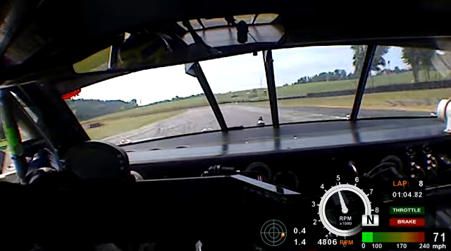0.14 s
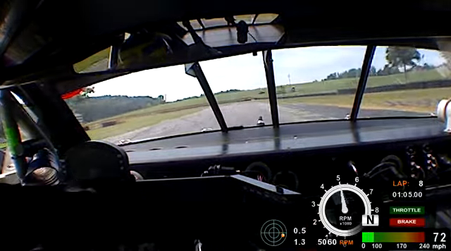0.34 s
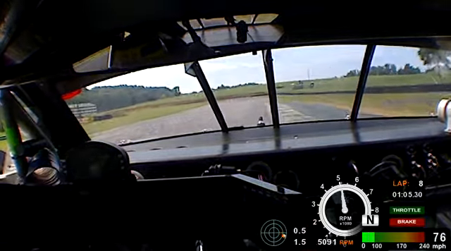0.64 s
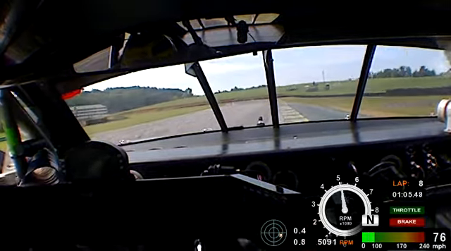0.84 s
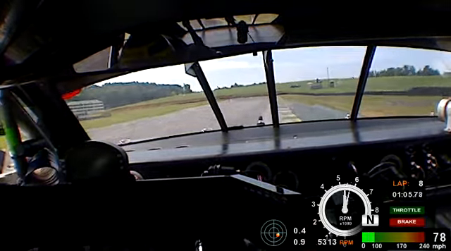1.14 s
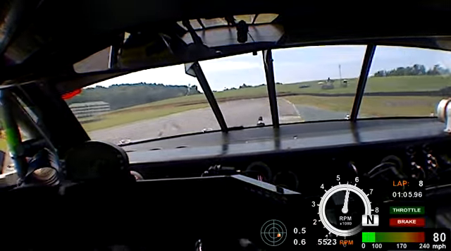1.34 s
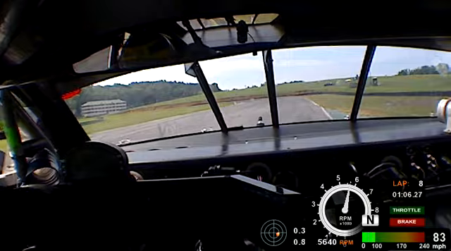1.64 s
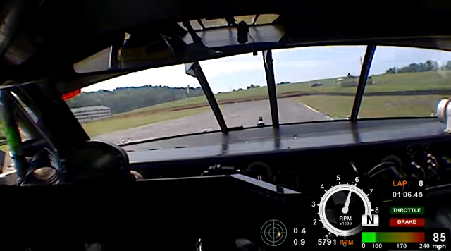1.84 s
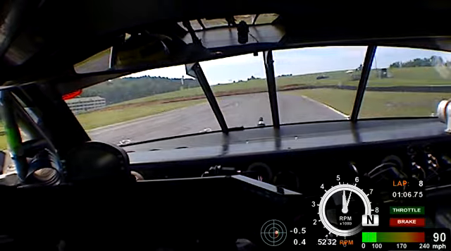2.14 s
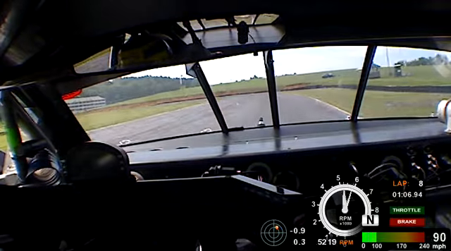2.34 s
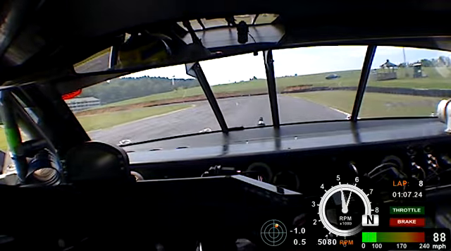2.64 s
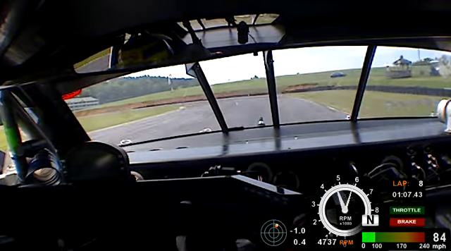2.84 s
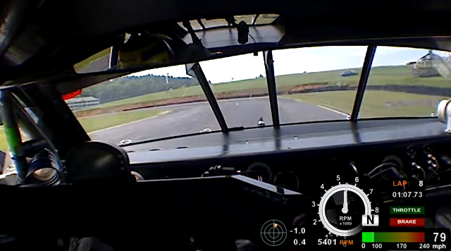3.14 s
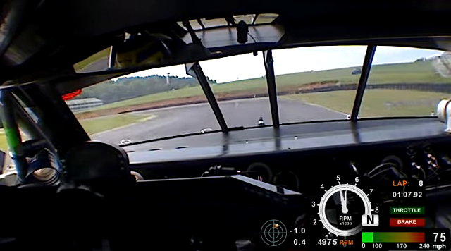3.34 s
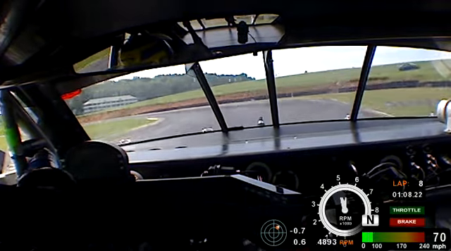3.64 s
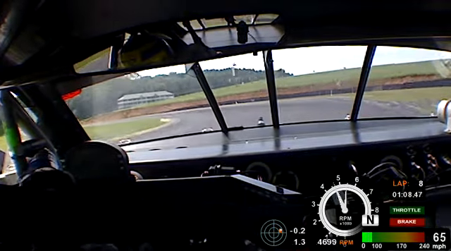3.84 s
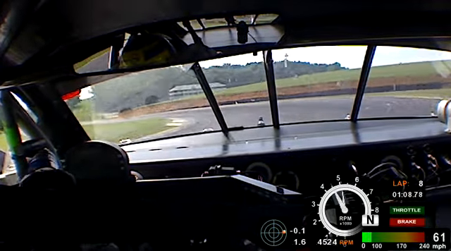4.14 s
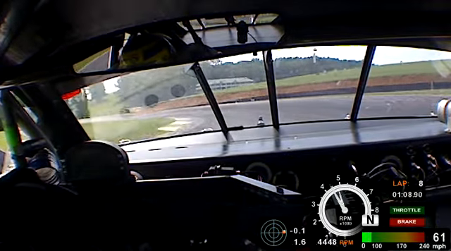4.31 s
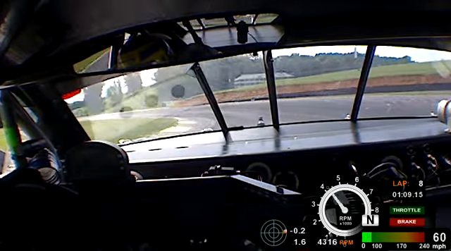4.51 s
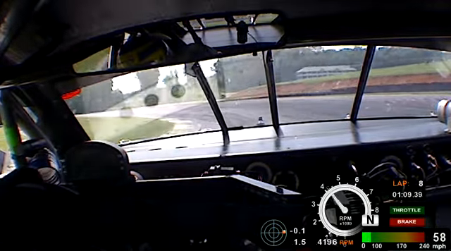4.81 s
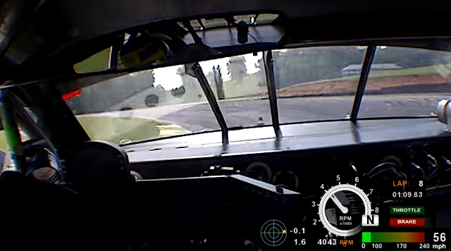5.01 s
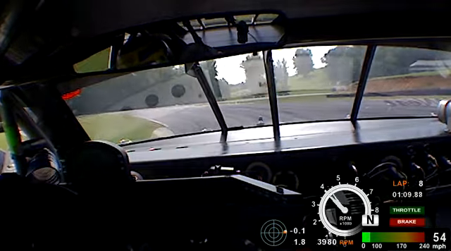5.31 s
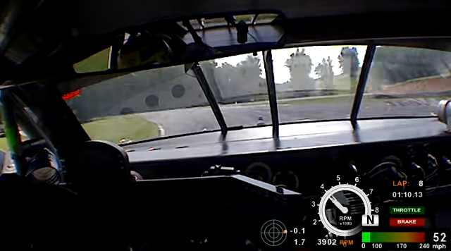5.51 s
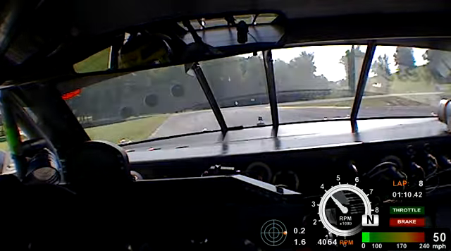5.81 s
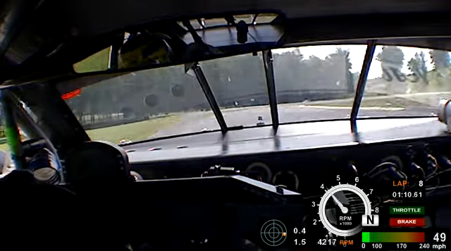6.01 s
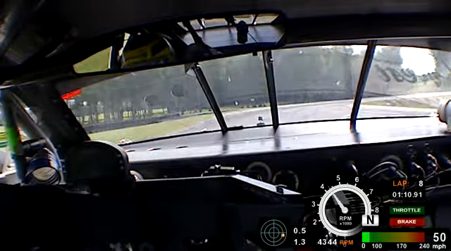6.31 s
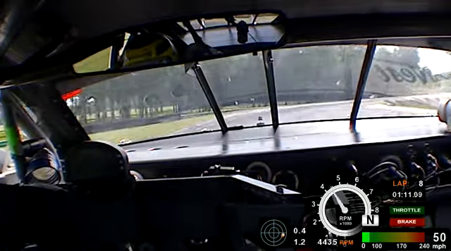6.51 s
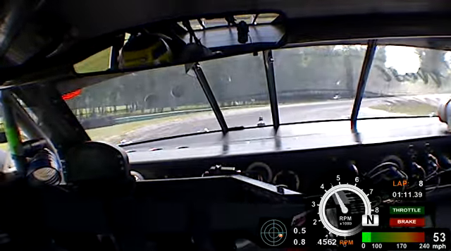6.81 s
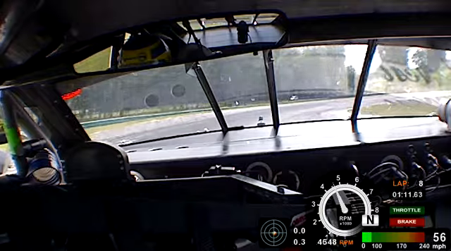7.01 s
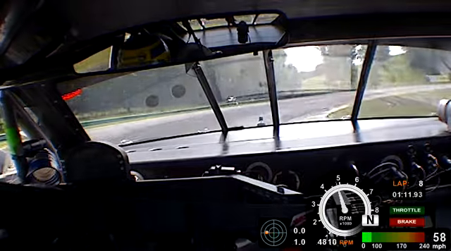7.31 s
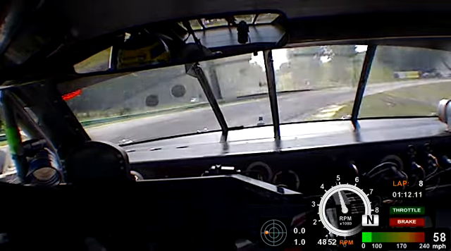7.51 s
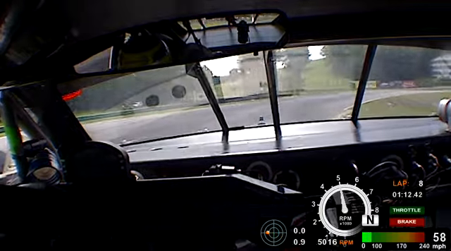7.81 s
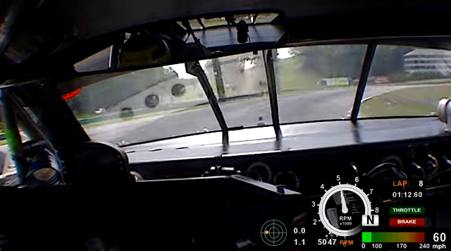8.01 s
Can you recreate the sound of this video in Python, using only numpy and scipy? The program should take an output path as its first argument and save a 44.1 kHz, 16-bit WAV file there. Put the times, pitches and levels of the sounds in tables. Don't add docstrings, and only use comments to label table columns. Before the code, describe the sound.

A rough, mono in-car sound: a gruff V8 under power, heavy kerb knocks, and panel roar. Throttle shuts, the roar drops, a downshift flares the revs briefly, and a clear gear whine slides down. After a small clunk, power returns with rising engine and strong whine, light tyre slip and final bumps, close and distorted with dull treble.

```python
import sys
import numpy as np
from scipy import signal
from scipy.fft import rfft, irfft, next_fast_len
from scipy.io import wavfile

SR = 44100
rng = np.random.default_rng(int(sys.argv[2]) if len(sys.argv) > 2 else 0)


def unload_audio(sound):
    columns = np.transpose(np.atleast_2d(sound))
    steps = np.round(np.clip(columns, -1, 1) * 32767)
    wavfile.write(sys.argv[1], SR, steps.astype(np.int16))


def gain_from_decibels(decibels):
    exponent = np.asarray(decibels, float) / 20
    return 10 ** exponent


N = 359415

# time_s, cycle_hz, order1_db, order3_db, order5_db, order6_db, order8_db
ENGINE_NOTES = [(0.0, 40.4, -25, -38, -28, -25, -31), (0.11, 41.15, -29, -31.0, -26.0, -40, -35.0),
                (0.3, 42.2, -25.5, -28.5, -22.5, -46, -32), (0.5, 42.8, -27.0, -27.5, -25.0, -32, -40),
                (0.7, 43.5, -23, -19, -27, -38, -36.0), (0.88, 44.35, -31, -19.5, -23.0, -33, -36),
                (1.11, 44.82, -33, -25, -28, -27, -34.0), (1.43, 46.65, -27.0, -17, -27.0, -39, -40.0),
                (1.6, 47.43, -28.0, -17.5, -39, -39, -36), (1.77, 48.8, -25, -13.5, -32.0, -34, -31.0),
                (1.86, 48.86, -20, -19.5, -26, -46, -34), (1.93, 45.8, -29, -15, -29.5, -39, -51),
                (2.18, 44.45, -29.0, -18.5, -21.5, -31, -43), (2.38, 42.2, -39.0, -19.5, -43, -34.0, -46),
                (2.54, 40.5, -25, -19.0, -41.0, -25.5, -39), (2.7, 39.1, -30, -20.5, -48, -28, -32),
                (2.77, 41.03, -20, -32, -30, -35, -36), (2.84, 45.06, -21, -21.5, -28.5, -35, -41),
                (2.95, 45.36, -34, -13, -24, -39.0, -38), (3.2, 42.12, -30, -20.5, -35, -31, -42),
                (3.45, 40.37, -38, -21.5, -32.5, -25, -33.5), (3.7, 39.54, -33, -27, -31.0, -26.0, -29),
                (4.0, 38.18, -35, -23.5, -23.5, -28.5, -33.5), (4.27, 36.79, -32.0, -34, -23.5, -30, -51),
                (4.86, 34.16, -33, -34, -28.5, -39, -43.5), (5.11, 33.27, -36, -30, -36.5, -43, -54),
                (5.45, 32.44, -40, -52, -27.5, -33.5, -39.5), (5.7, 33.97, -37, -54, -29, -35.5, -37),
                (5.9, 35.1, -44, -40, -22.0, -27.5, -28.5), (6.15, 36.25, -34, -34.5, -16.5, -28.5, -41),
                (6.51, 38, -38, -44, -20.5, -27.0, -48), (6.67, 37.7, -33.0, -47, -22.5, -29.0, -50),
                (6.94, 38.82, -33, -29, -29, -36, -37), (7.26, 40.5, -29.5, -26, -28.5, -29, -37),
                (7.72, 40.91, -28.5, -26.5, -28.5, -28, -41), (8.04, 42.78, -18.5, -20, -20.5, -28.5, -36),
                (8.15, 43.16, -27, -27.0, -43, -30.0, -34)]
# order, on_power_db, off_throttle_db
UNEVEN_FIRING = [(2, -30, -38.5), (4, -28.5, -32), (7, -37, -46), (12, -43.5, -43.5), (13, -37.5, -50.5),
                 (14, -42.5, -53), (15, -41, -51.5), (16, -42, -51), (17, -51, -58.5), (18, -41, -56.5),
                 (19, -44, -57), (20, -40, -53)]
# time_s, order9_db, order10_db, order11_db
INTAKE_BARK = [(0.0, -41, -25.5, -27.8), (0.29, -48, -50, -19), (0.58, -26, -28, -23.5),
               (0.87, -28.1, -25, -27.5), (1.16, -30.5, -28, -32.5), (1.46, -25.5, -20, -43),
               (1.749, -20, -24.5, -41), (2.04, -41, -43, -49), (2.33, -46, -40.5, -32.5),
               (2.91, -48, -36, -31.5), (3.2, -46, -36, -30.5), (3.49, -44, -28.5, -36),
               (3.78, -53, -45, -37), (4.37, -44, -39.5, -53), (5.241, -56, -45.2, -53.5),
               (5.53, -38, -63, -35), (5.82, -32.5, -47.4, -42.5), (6.4, -51, -42.4, -30),
               (6.69, -54, -46, -32), (6.99, -47, -42.5, -32), (7.57, -34.5, -36, -31),
               (7.86, -35.5, -34.5, -28.5), (8.15, -34, -34, -28.5)]
# pitch_hz, width_hz, lift_db
CABIN_BOOM = [(168, 35, -7.5), (471, 20, 7), (806, 87, 5.5)]
# time_s, pitch_hz, level_db
AXLE_WHINE = [(1.95, 1810, -41), (2.05, 1838, -31), (2.25, 1798, -24.5), (2.35, 1752, -28.5),
              (2.45, 1723, -21), (2.55, 1691.0, -28.5), (2.65, 1630, -23.0), (2.75, 1614, -21.5),
              (2.85, 1527, -35.8), (3.05, 1497, -35.5), (3.15, 1435, -34), (3.25, 1392, -41),
              (3.35, 1363, -22.5), (3.45, 1380, -34), (3.55, 1341.0, -31.5), (3.75, 1314, -35),
              (3.95, 1277, -25.5), (4.05, 1273, -22), (4.15, 1249.0, -23), (4.25, 1234, -18),
              (4.35, 1230, -24), (4.45, 1212, -29.5), (4.55, 1189, -25.5), (4.65, 1178, -29),
              (4.75, 1154, -37), (4.95, 1134, -34.5), (5.25, 1077, -30.5), (5.35, 1061, -33),
              (5.45, 1079, -32), (5.55, 1097, -33.5), (5.65, 1140, -33.5), (5.75, 1140, -23),
              (5.95, 1176.0, -19), (6.15, 1211, -18.5), (6.25, 1238, -14), (6.35, 1253, -12.5),
              (6.65, 1274, -12.5), (6.75, 1265, -22), (6.85, 1308, -24.5), (6.95, 1330, -32),
              (7.05, 1333, -28), (7.15, 1344.0, -22.5), (7.65, 1367, -22.5), (7.75, 1369, -27),
              (7.85, 1408, -25), (7.95, 1419, -27.5), (8.15, 1449.0, -27.5)]
# time_s, pitch_hz, level_db
GEARBOX_WHINES = [
    [(0.0, 1650, -23.5), (0.2, 1732, -30), (0.4, 1844, -32), (0.6, 1742, -33), (0.8, 1866, -45)],
    [(0.7, 1662, -35.1), (0.9, 1594, -27), (1.1, 1601, -47), (1.3, 1611, -23.5), (1.5, 1651, -43),
     (1.7, 1735, -36.2), (1.9, 1732, -53)],
    [(1.3, 1240, -48), (1.6, 1270, -29), (1.9, 1302, -42.1)],
    [(1.1, 1610, -27), (1.3, 1726, -32), (1.5, 1723, -43), (1.7, 1837, -42), (1.9, 1720, -39)],
    [(2.95, 1777.0, -33), (3.25, 1630.0, -38), (3.85, 1515.0, -44), (4.45, 1404.0, -32),
     (4.75, 1351.0, -37), (5.35, 1262.0, -41), (5.65, 1315.0, -33.5), (5.95, 1375.0, -25),
     (6.25, 1434.0, -26.5), (6.55, 1475.0, -32.8), (6.85, 1515.0, -36), (7.45, 1588.0, -30.5),
     (8.05, 1677.0, -35)],
    [(5.45, 1400, -32.5), (5.58, 1380, -48)],
    [(5.47, 1200, -33), (5.58, 1009, -45.5)],
]
# centre_s, half_length_s
TEETH_PART = [(2.768, 0.038), (3.432, 0.011), (3.598, 0.0094), (4.051, 0.02), (5.428, 0.048),
              (4.195, 0.0064), (4.366, 0.009), (6.169, 0.014), (6.801, .012), (6.88, 0.0072), (6.95, 0.011),
              (7.018, 0.014), (7.089, 0.017), (7.854, 0.017)]
# time_s, pitch_hz, level_db
TYRE_SCRUB = [
    (7.15, 929, -61),
    (7.35, 1032, -32.5),
    (7.68, 1047, -31),
    (7.8, 887, -33.5),
    (8.15, 853.4, -40),
]
# pitch_hz, width_hz, lift_db
PANEL_MODES = [(1704, 10, 8), (2260, 85, 3.5), (2570, 14, 8.5), (3073, 17, 11), (3870, 210, 5),
               (5130, 73, -6.5), (5540, 37, 4), (5940, 35, 6.5)]
# time_s, floor_rumble_db, panel_roar_db, hiss_db
ROAR_LEVELS = [(0, -19, -30.0, -41.5), (0.1, -17.5, -27, -38.5), (0.5, -17, -26, -36.5),
               (0.6, -5.5, -24.5, -36), (0.75, -7.5, -24, -34.5), (0.97, -3, -23.5, -35.0),
               (1.1, -10, -25.5, -35), (1.4, -13, -26.5, -34.5), (1.7, -13.5, -25.0, -34),
               (1.86, -9.5, -26.5, -35), (1.89, -12, -32.0, -46), (1.92, -11, -33.5, -44),
               (1.95, -7, -28.5, -37), (2.05, -15.5, -29.0, -43.5), (2.25, -16, -31, -42),
               (2.33, -12.5, -32.5, -47.0), (2.55, -19.5, -32.5, -47), (2.73, -11.5, -33.5, -47.5),
               (2.77, -18.0, -34.5, -51), (2.83, -17, -31, -43), (2.95, -23, -30.0, -40.5),
               (3.1, -31, -33, -45.0), (3.25, -18.5, -33, -46.5), (3.8, -22, -33, -48.5),
               (4.2, -15, -33, -49.5), (4.45, -28, -34.5, -50.5), (4.75, -18, -35.5, -54.5),
               (5.05, -25.0, -37.5, -59.0), (5.3, -20, -36, -58), (5.4, -26.0, -39, -64.0),
               (5.46, -19, -36.5, -54.5), (5.68, -23.5, -35, -55.5), (5.8, -12, -31, -47.5),
               (6, -22, -29, -43), (6.15, -19, -29, -43.5), (6.35, -24, -28.5, -38.5),
               (6.55, -18.5, -28.0, -40), (6.68, -28, -29, -43.5), (6.75, -21.5, -33.5, -53.0),
               (6.9, -31, -33.5, -53), (7.3, -27, -33, -48), (7.72, -24, -32.5, -49),
               (7.8, -8, -29.5, -46.0), (7.88, -16, -31.5, -44.5), (8, -12.5, -26.5, -42),
               (8.15, -10.5, -29.0, -43)]
# frequency_hz, level_db (per Hz)
RUMBLE_COLOUR = [(12, -44), (20, -6), (44, -2), (75, -7), (143, 2.5), (206, 1), (264, -19), (376, -28),
                 (400, -11.5), (520, -47), (880, -120)]
# frequency_hz, level_db (per Hz)
PANELS_ON_POWER = [(150, -40), (250, -2), (364, -15), (447, -1.5), (561, -14), (865, -11), (1070, -14.5),
                   (1550, -10), (1710, -9), (2830, -14), (3060, -15.5), (3430, -24.5), (3800, -26.5),
                   (4940, -54.5), (8360, -120)]
# frequency_hz, level_db (per Hz)
PANELS_OFF_THROTTLE = [(150, -29.5), (250, -1), (377, -15.5), (484, 2), (681, -21), (865, 1.5),
                       (1000, -8.5), (1260, -3), (1510, -7.5), (1750, -4.5), (2610, -12), (3170, -15),
                       (3800, -27), (4940, -49.5), (8360, -120)]
# frequency_hz, level_db (per Hz)
HISS_COLOUR = [(1880, -25.5), (3200, -2.5), (3480, -18.5), (4720, -9), (5230, -16), (5830, -13.5),
               (6380, -18), (7130, -16), (7750, -11.5), (8590, -24.5), (11200, -85.5), (18900, -120)]
# start_s, peak_db, pitch_hz
FLOOR_THUMPS = [(0.563, 7, 143), (0.583, 3, 145), (0.614, 6.5, 229), (0.64, 5.5, 165), (0.734, -2, 138),
                (0.797, -3, 136), (0.82, -2, 133.7), (0.939, 1.5, 146.8), (0.974, 5, 209),
                (1.931, -10, 132), (2.009, -1, 142.5), (2.79, -4, 129), (4.169, -11, 132.1),
                (5.289, -12.5, 154.1), (7.789, -4, 129.5), (7.939, 1, 193.6), (7.988, 2, 140),
                (8.019, -3.5, 218.5)]
# start_s, peak_db
LOOSE_KNOCKS = [(0.5828, -22), (0.6846, -20.5), (0.7077, -14), (0.7226, -17), (0.8285, -7), (0.9148, -14.5),
                (0.9662, -6.5), (0.9948, -9.5), (1.1587, -24), (1.205, -15), (1.3187, -33), (1.4057, -29),
                (1.4955, -27), (1.575, -17), (1.5955, -16), (1.727, -33), (1.7486, -12), (1.8654, -20),
                (1.9337, -9.5), (2.0043, -19), (2.0143, -12.5), (2.7798, -23), (2.8251, -17),
                (4.2713, -21.5), (4.7228, -23.5), (6.1454, -15.5), (7.7667, -21), (7.853, -15.5),
                (7.9453, -13.5), (7.974, -9), (7.9971, -10), (8.0242, -13), (8.0631, -22), (8.072, -19),
                (8.084, -13)]
# pitch_hz, level_db, fade_60db_s
LOOSE_PART_MODES = [(3936, -0.5, .012), (4210, -4, 0.011), (5740, -10, .008), (5200, -6, 0.0022)]
# start_s, peak_db
DRIVELINE_CLUNKS = [
    (1.924, -15),
    (2.806, -22),
    (5.436, -25),
    (5.442, -21),
    (5.458, -29),
]
# pitch_hz, level_db, fade_60db_s
DRIVELINE_MODES = [(803, 0, 0.027), (1017, -7.5, 0.034), (483, -7, 0.07), (2350, -8, .015),
                   (756, -2.5, 0.042)]

IDLE_DB, FULL_DB = -34, -26
CEILING = 0.71


def rms_one(x):
    return x / np.sqrt(np.mean(x ** 2) + 1e-20)


def in_time(rows):
    time_s, *columns = np.transpose(rows)
    return [np.interp(np.arange(N) / SR, time_s, column) for column in columns]


def drift(rate_hz):
    step = 40
    r = np.exp(-2 * np.pi * rate_hz * step / SR)
    white = rng.standard_normal(N // step + 2002)
    slow = signal.lfilter([1], [1, -2 * r, r * r], white)[2000:]
    return np.interp(np.arange(N) / step, np.arange(len(slow)), rms_one(slow))


def turns(hz):
    return 2 * np.pi * np.cumsum(hz) / SR


def lifted(hz, modes):
    return sum(db / (1 + (2 * (hz - f) / width) ** 2) for f, width, db in modes)


def coloured(white, spectrum, low_hz, high_hz, ringing=1):
    hz = np.arange(len(white) // 2 + 1) * SR / len(white) + 1
    points = np.array(spectrum)
    gain_db = np.interp(np.log(hz), np.log(points[:, 0]), points[:, 1])
    gain_db = gain_db + ringing * lifted(hz, PANEL_MODES)
    bins = rfft(white) * gain_from_decibels(gain_db)
    inside = irfft(bins * (hz > low_hz) * (hz < high_hz), len(white))
    return irfft(bins, len(white))[:N] / np.std(inside)


def strike(events, modes, spread_db):
    rows, out = np.array(events), np.zeros(N)
    luck = rng.standard_normal((len(rows), len(modes)))
    for k, (hz, level_db, fade_s) in enumerate(modes):
        clicks = np.full(N, 1e-18)
        clicks[(rows[:, 0] * SR).astype(int)] = gain_from_decibels(rows[:, 1] + level_db + spread_db * luck[:, k])
        r = gain_from_decibels(-60 / (fade_s * SR))
        w = 2 * np.pi * hz / SR
        out += signal.lfilter([0, np.sin(w)], [1, -2 * r * np.cos(w), r * r], clicks)
    return out


def engine(load):
    cycle_hz, *boom_db = in_time(ENGINE_NOTES)
    phase = turns(cycle_hz)
    lines = list(zip((1, 3, 5, 6, 8), boom_db))
    for order, db in zip((9, 10, 11), in_time(INTAKE_BARK)):
        lines.append((order, db - 3.6 * (1 - load)))
    for order, on_db, off_db in UNEVEN_FIRING:
        db = off_db + (on_db - off_db) * load
        db = db + lifted(order * cycle_hz, CABIN_BOOM)
        lines.append((order, db + 3.6 * drift(3.8)))

    flutter = 0.012 * drift(30)
    tones = np.zeros(N)
    for order, db in lines:
        level = gain_from_decibels(db + 1.26 * drift(14))
        offset = 1.33 * rng.standard_normal() + 0.27 * drift(6)
        tones += level * np.sin(order * (phase + flutter) + offset)
    return np.sqrt(2) * tones, phase


def final_drive(load):
    hz, db = in_time(AXLE_WHINE)
    t = np.arange(N) / SR
    phase = turns(hz) + 0.35 * drift(25)
    contact = 1.0 * (t > AXLE_WHINE[0][0])
    for centre_s, half_s in TEETH_PART:
        contact *= 1 - 1.01 * np.exp(-((t - centre_s) / half_s) ** 4)
    throb = 1 + 0.3 * (1 - load) * np.sin(phase / 30)
    octave = gain_from_decibels(-18) * np.sqrt(load) * (t > 5.6) * np.sin(2 * phase)
    return gain_from_decibels(db + 0.83 * drift(10)) * contact * (throb * np.sin(phase) + octave)


def gearbox():
    out = np.zeros(N)
    for rows in GEARBOX_WHINES:
        first, last = rows[0], rows[-1]
        fade_in = (first[0] - 0.03, first[1], -70)
        fade_out = (last[0] + 0.11, last[1], -70)
        hz, db = in_time([fade_in] + list(rows) + [fade_out])
        level = gain_from_decibels(db - 2.5 + 2.5 * drift(34))
        out += level * np.sin(turns(hz) + 0.28 * drift(20))
    return out


def gears(load):
    return np.sqrt(2) * (final_drive(load) + gearbox())


def thumps():
    out, t = np.zeros(N), np.arange(round(0.2 * SR)) / SR
    envelope = (1 - np.exp(-t / 0.004)) * np.exp(-t / 0.025)
    panel = 0.27 * np.sin(2 * np.pi * 385 * t)
    for start_s, db, hz in FLOOR_THUMPS:
        at = round(start_s * SR)
        floor = np.sin(2 * np.pi * hz * t)
        heave = 0.45 * np.sin(np.pi * hz * t)
        swing = gain_from_decibels(db - 9) * envelope * (floor + heave + panel)
        out[at:at + len(t)] += swing[:N - at]
    return out


def rattles():
    return gain_from_decibels(-5.5) * strike(LOOSE_KNOCKS, LOOSE_PART_MODES, spread_db=1.0)


def clunks():
    return strike(DRIVELINE_CLUNKS, DRIVELINE_MODES, spread_db=4.5)


def tyres():
    hz, db = in_time(TYRE_SCRUB)
    phase = turns(hz)
    return gain_from_decibels(db) * (drift(70) * np.sin(phase) + drift(70) * np.cos(phase))


def roar(phase, load):
    rumble_db, panel_db, hiss_db = in_time(ROAR_LEVELS)
    white = rng.standard_normal((3, next_fast_len(N)))
    beat = 0.9 * np.cos(8 * phase) + 0.8 * np.cos(5 * phase + 1.1)
    beat += 0.6 * np.cos(phase) + 0.6 * np.cos(2 * phase + 2.1)
    shake = drift(30)

    burble_db = 4.5 * (1 - load) * np.cos(phase)
    rumble_level = gain_from_decibels(rumble_db - 10.5 + burble_db + 2.5 * drift(7))
    rumble = rumble_level * coloured(white[0], RUMBLE_COLOUR, 20, 300)

    on_power = coloured(white[1], PANELS_ON_POWER, 1700, 2900)
    off_throttle = coloured(white[1], PANELS_OFF_THROTTLE, 1380, 3600, ringing=0.35)
    panels = load ** 2 * on_power + (1 - load ** 2) * off_throttle
    panels = gain_from_decibels(panel_db + 0.2 + 0.56 * beat + 0.53 * shake) * panels

    hiss_level = gain_from_decibels(hiss_db + 0.13 + 1.1 * beat + 0.7 * shake + 0.7 * drift(120))
    hiss = hiss_level * coloured(white[2], HISS_COLOUR, 5400, 8000)
    return rumble + panels + hiss


def scene():
    panel_db = in_time(ROAR_LEVELS)[1]
    load = np.clip((panel_db - IDLE_DB) / (FULL_DB - IDLE_DB), 0, 1)
    tones, phase = engine(load)
    knocks = rattles() + clunks()
    mix = tones + gears(load) + thumps() + knocks + tyres() + roar(phase, load)
    return mix[None]


def roll_off(x):
    return signal.sosfilt(signal.butter(12, 15830, fs=SR, output="sos"), x)


def record(dry):
    overloaded = np.clip(dry, -CEILING, CEILING)
    treble_cut = signal.cheby2(10, 55, 8700, fs=SR, output="sos")
    cut = signal.sosfilt(treble_cut, overloaded)
    finished = np.clip(gain_from_decibels(-0.2) * cut, -CEILING, CEILING)
    return roll_off(finished)


dry = scene()
out = record(dry)
unload_audio(out)
```